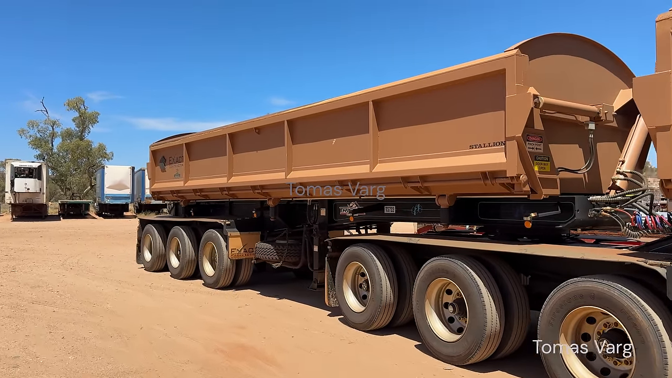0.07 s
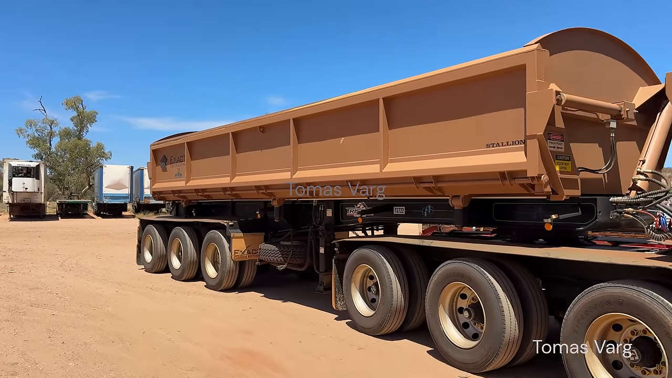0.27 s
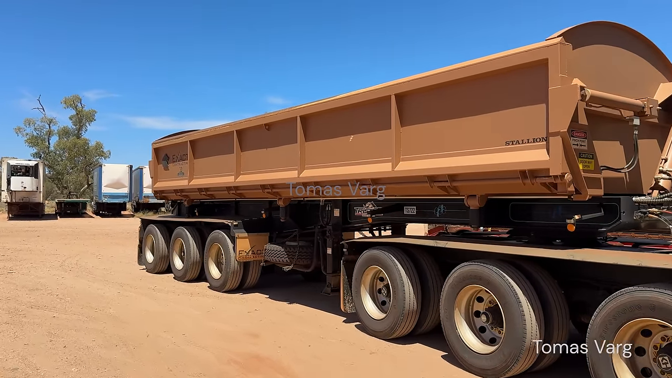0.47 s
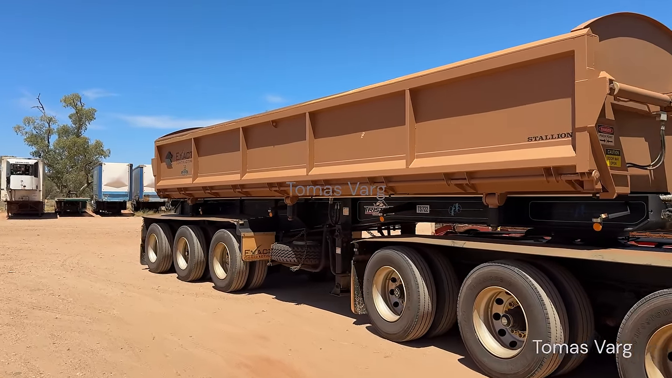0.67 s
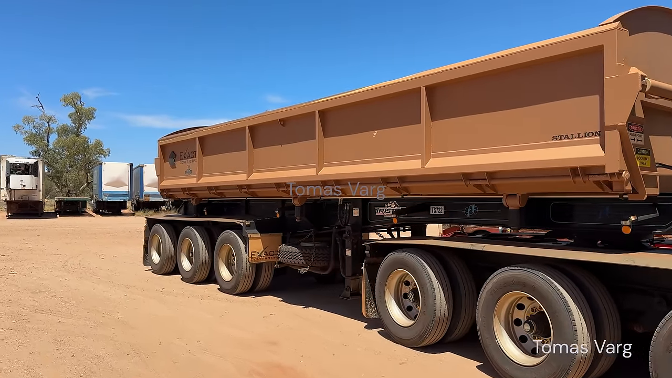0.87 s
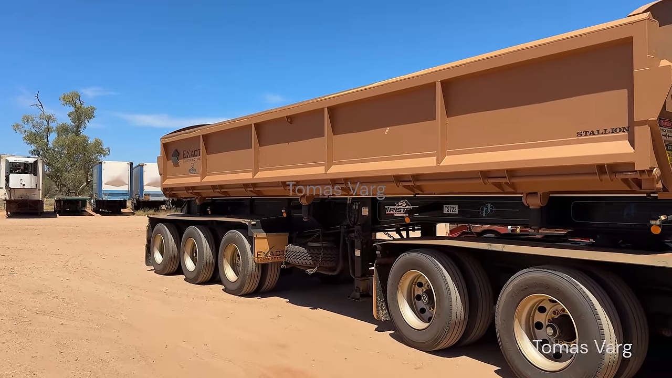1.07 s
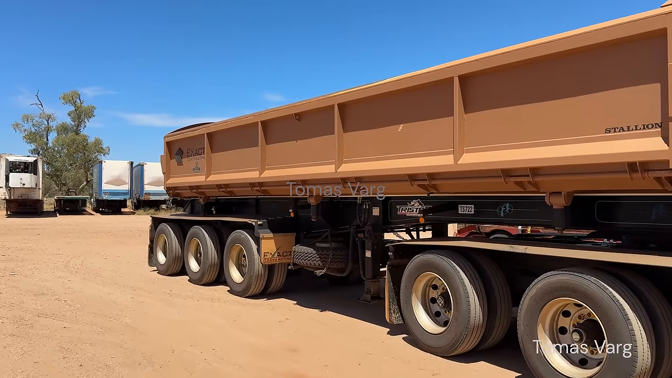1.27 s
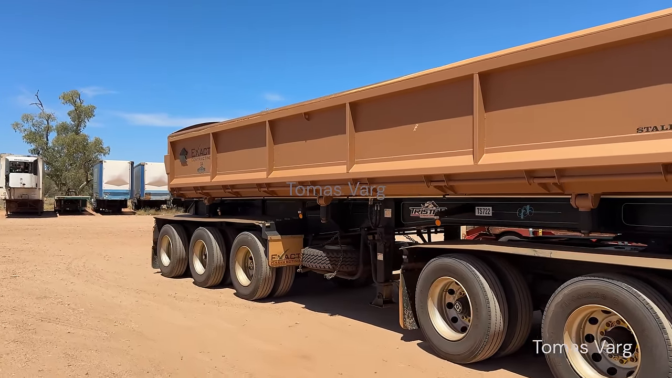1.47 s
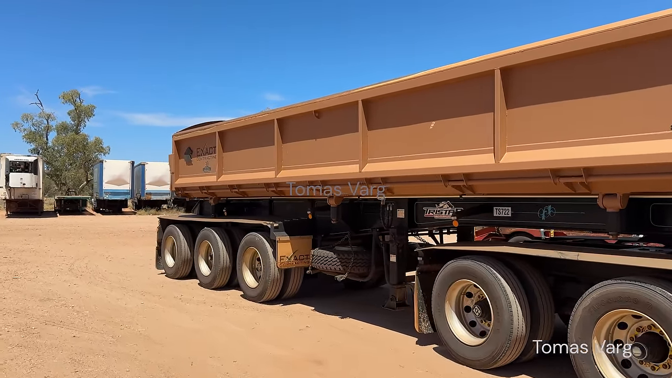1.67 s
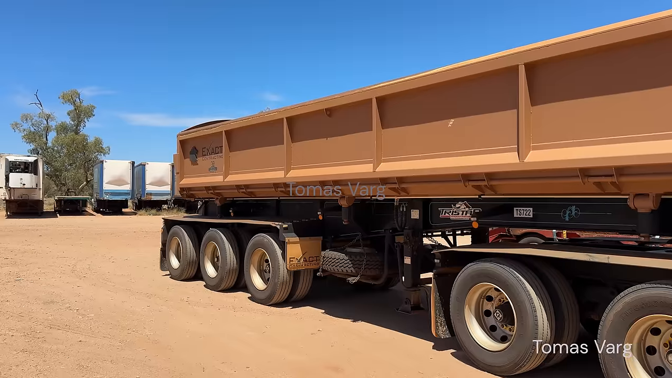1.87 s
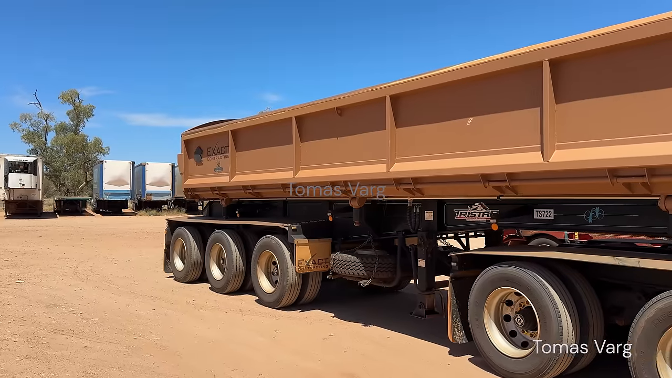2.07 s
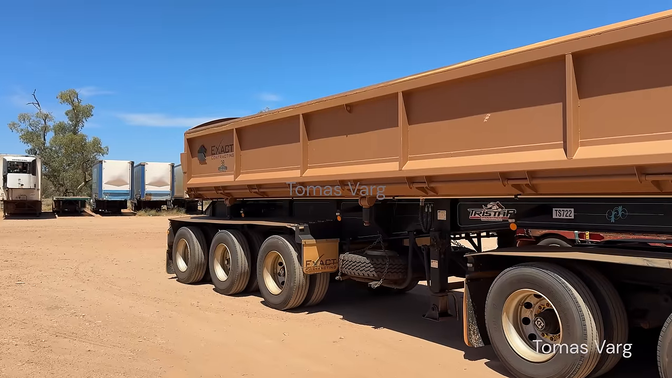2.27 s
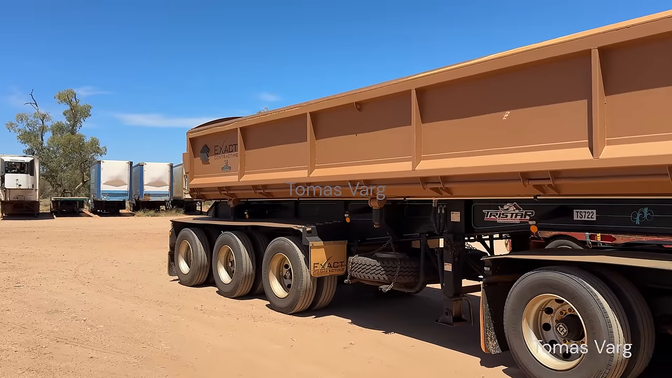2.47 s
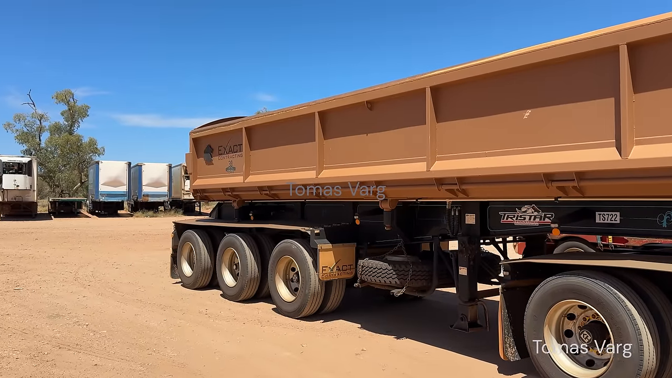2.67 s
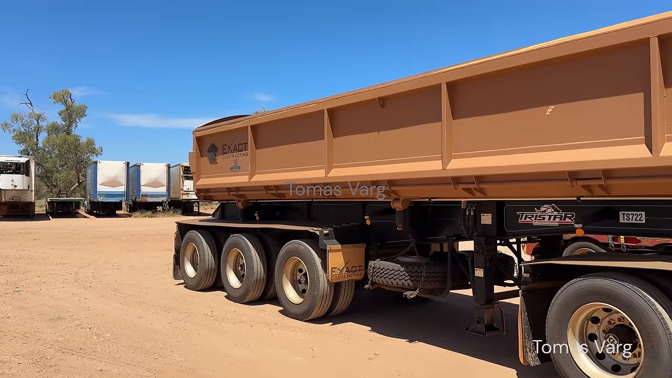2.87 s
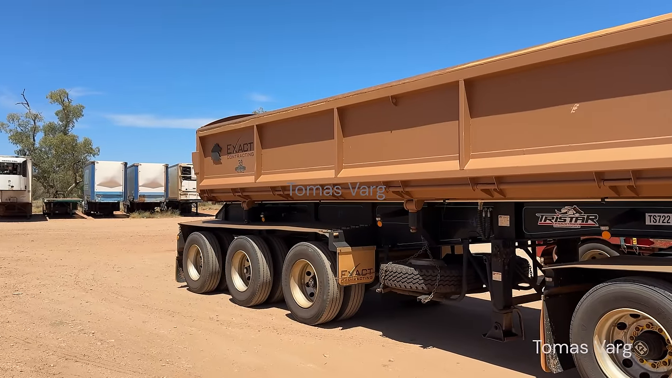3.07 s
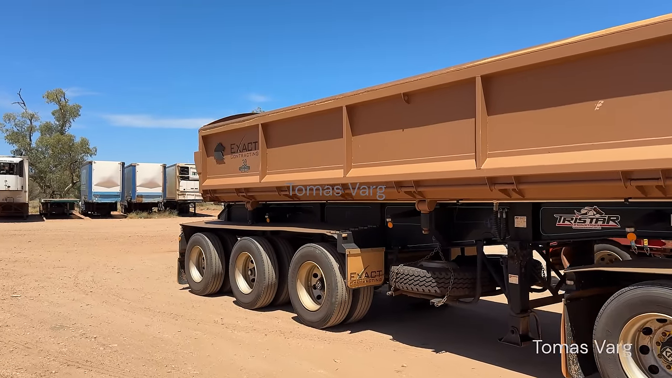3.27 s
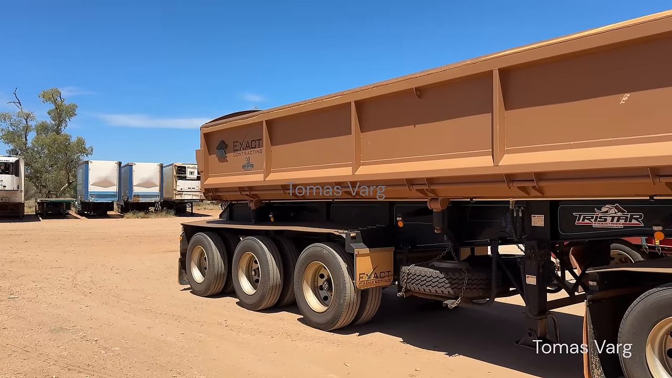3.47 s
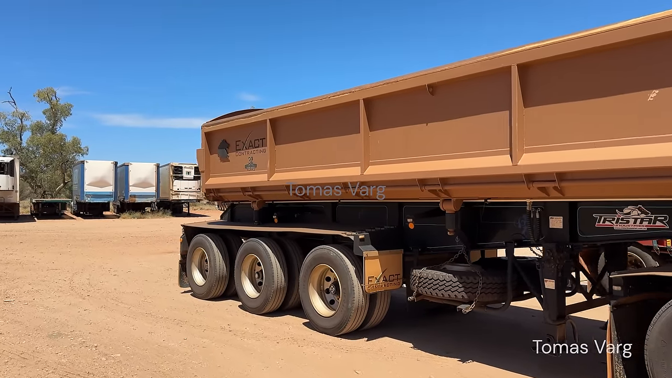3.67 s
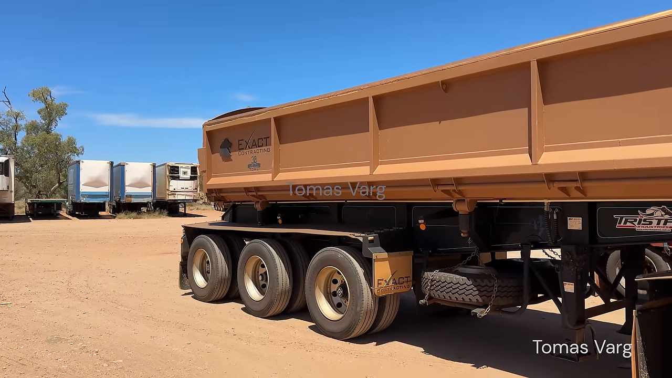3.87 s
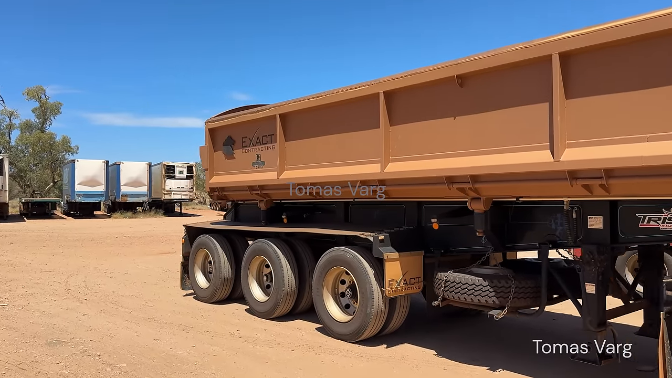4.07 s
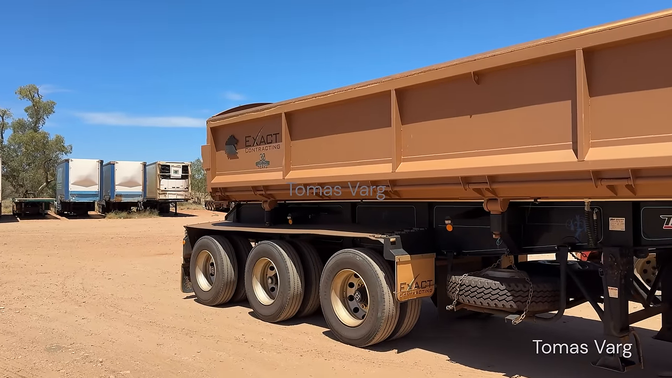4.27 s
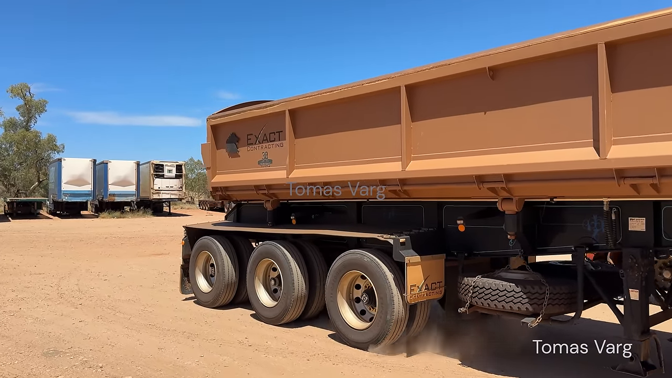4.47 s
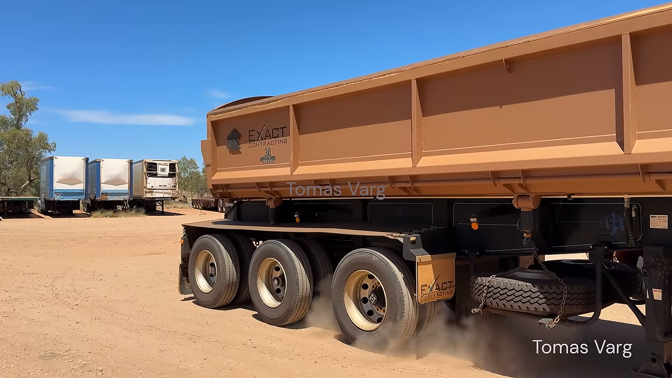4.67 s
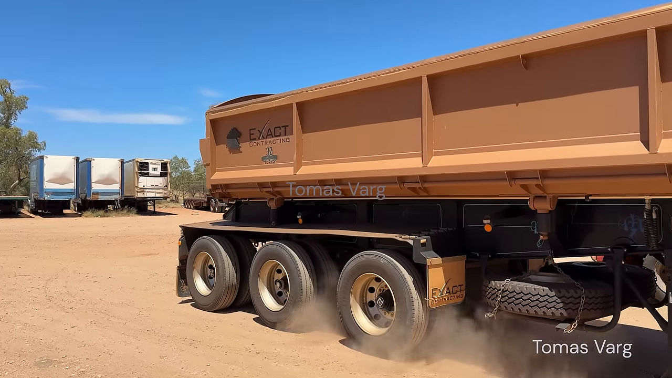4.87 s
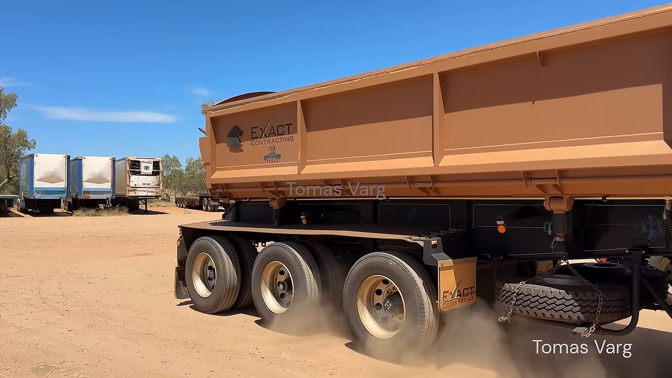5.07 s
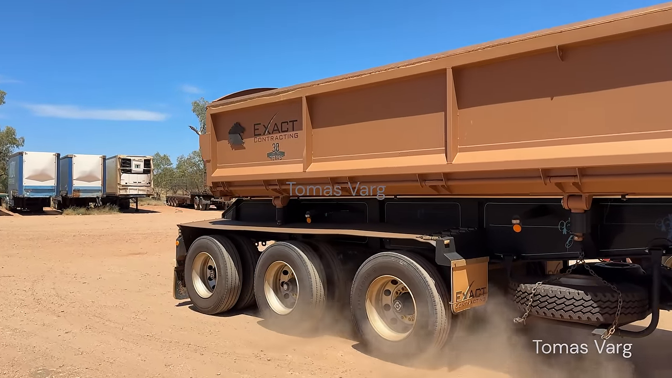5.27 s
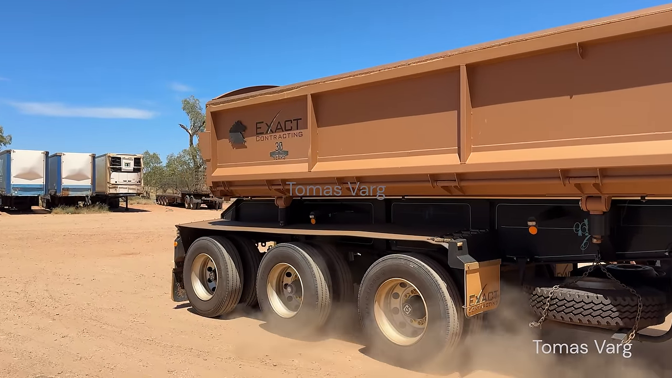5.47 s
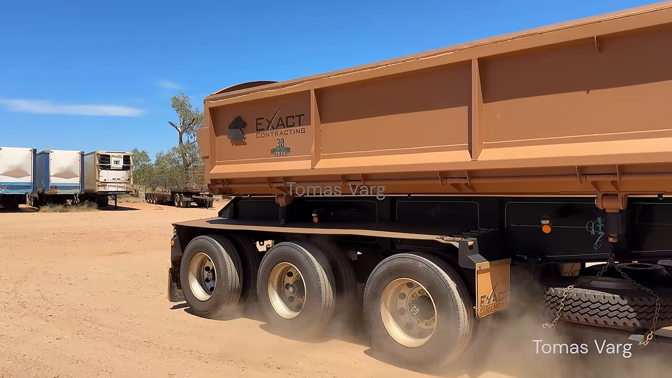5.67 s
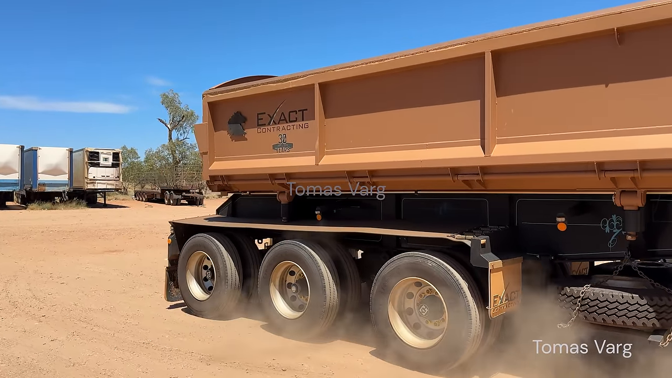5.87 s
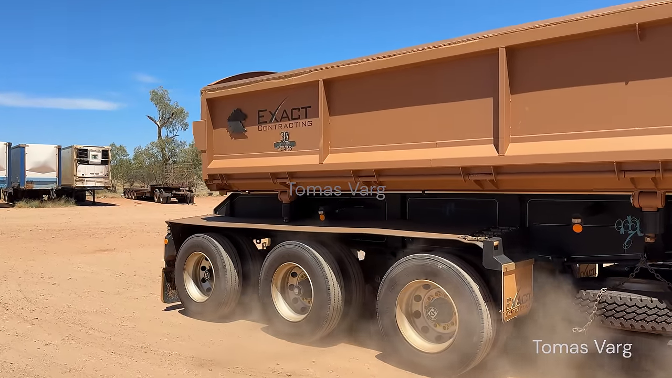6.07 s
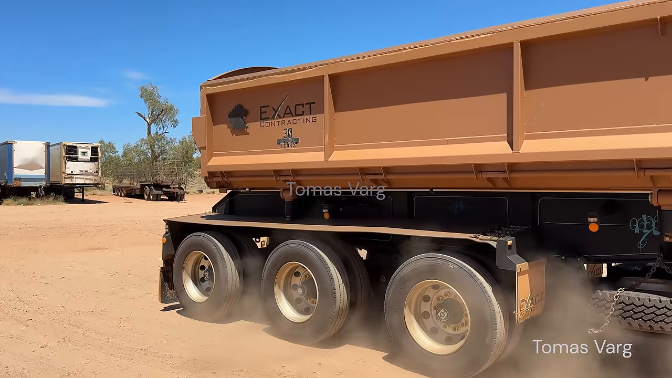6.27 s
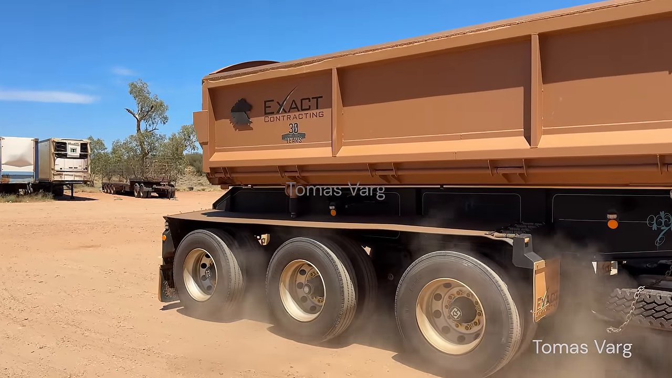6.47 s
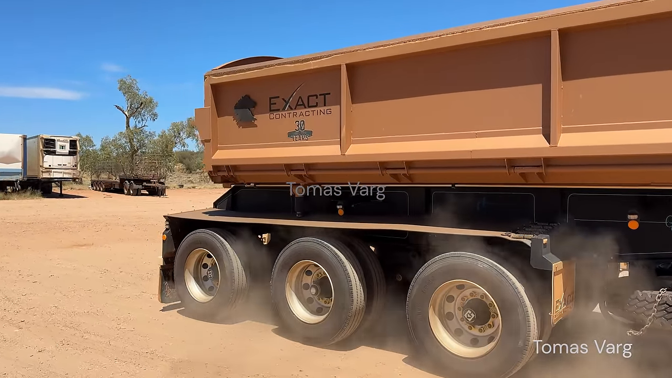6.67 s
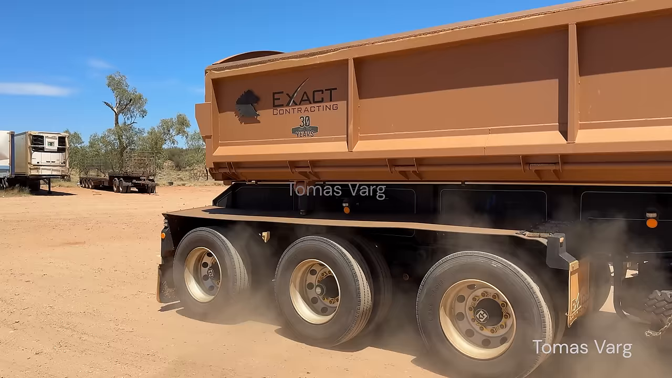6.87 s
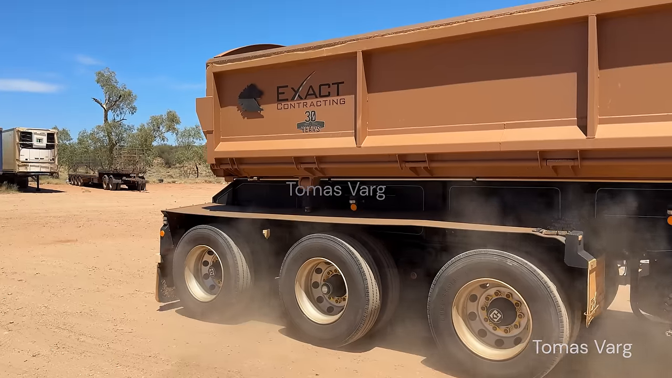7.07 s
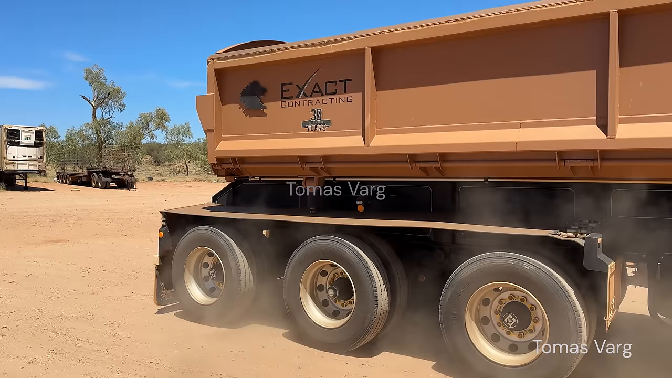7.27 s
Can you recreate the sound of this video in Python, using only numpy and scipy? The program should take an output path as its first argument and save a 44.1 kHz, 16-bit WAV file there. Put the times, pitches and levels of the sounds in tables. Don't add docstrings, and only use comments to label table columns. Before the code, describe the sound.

Steps crunch on grit over two idling diesels, then truck air brakes dump in loud overlapping hisses with low thumps, and a weaker second round follows.

```python
import sys
import numpy as np
from scipy import signal
from scipy.fft import rfft, irfft, next_fast_len
from scipy.io import wavfile

SR = 44100
rng = np.random.default_rng(int(sys.argv[2]) if len(sys.argv) > 2 else 0)


def file_out(sig):
    cols = np.atleast_2d(sig).T
    lim = np.clip(cols, -1, 1)
    pcm = np.round(lim * 32767).astype(np.int16)
    wavfile.write(sys.argv[1], SR, pcm)


def linear_from_db(decibels):
    return 10 ** (np.asarray(decibels, float) / 20)


N = 322812

# frequency in Hz, left minus right in dB.
FAR_BALANCE = [(60, 2.5), (110, 0.5), (200, 1.5), (380, -1.5), (700, -4.5), (1290, -2), (2380, -1.5),
               (4400, 5), (8120, 3.5), (15000, -15)]


def rms_one(x):
    return x / np.sqrt(np.mean(x ** 2) + 1e-20)


def in_time(rows):
    seconds, *columns = np.transpose(rows)
    return [np.interp(np.arange(N) / SR, seconds, column) for column in columns]


def at_hz(points, hz):
    table_hz, values = np.array(points).T[:2]
    return np.interp(np.log(hz), np.log(table_hz), values)


def drift(size, rate):
    knot_rate = 60
    knots = rng.standard_normal(int(size / SR * knot_rate) + 200)
    memory = np.exp(-2 * np.pi * rate / knot_rate)
    slow = rms_one(signal.lfilter([1], [1, -memory], knots))[190:]
    return np.interp(np.arange(size) / SR * knot_rate, np.arange(len(slow)), slow)


def stereo_noise(size, colour_db, like, balance, lag, patchy_db):
    hz = np.arange(1, size // 2 + 2) * SR / size
    shared, left, right = rfft(rng.standard_normal((3, size)))
    alike = np.clip(at_hz(like, hz), 0, 1)
    late = np.exp(-2j * np.pi * hz * lag / SR)
    pair = np.sqrt(alike) * shared * [late, np.ones_like(late)]
    pair += np.sqrt(1 - alike) * np.array([left, right])
    pair *= linear_from_db(colour_db(hz) + at_hz(balance, hz) / 2 * np.array([[1], [-1]]))
    octave = np.clip(np.log2(hz / 250), 0, 5)
    together = drift(size, 5.0)
    total = np.zeros((2, size))
    for k in range(6):
        band = irfft(pair * np.clip(1 - abs(octave - k), 0, 1), size)
        total += band * linear_from_db(patchy_db * (0.68 * together + drift(size, 10.3)))
    return rms_one(total)


def yard(gain, air):
    # frequency in Hz, level in dB per Hz.
    wash_colour = [(25, -33), (45, -12.5), (70, -2.5), (130, -7.5), (200, -18), (300, -22), (600, -26),
                   (1200, -29), (2200, -37), (3500, -48.5), (6000, -55), (9000, -62.5), (12000, -70.5),
                   (15500, -97)]
    # frequency in Hz, likeness of the two ports from 0 to 1.
    wash_like = [(60, 1), (250, 0.7), (600, 0), (1200, 0.55), (2500, 0.25), (8000, 0)]
    calm_db, stirred_db, stir_s = -41.5, -25, 0.05
    size = next_fast_len(N)
    wash = stereo_noise(size, lambda hz: at_hz(wash_colour, hz), wash_like, FAR_BALANCE, 10.6, patchy_db=1.4)
    memory = np.exp(-1 / (stir_s * SR))
    stirred = signal.lfilter([1 - memory], [1, -memory], np.mean(air ** 2, axis=0))
    power = (linear_from_db(calm_db) * gain) ** 2 + linear_from_db(stirred_db) ** 2 * abs(stirred)
    return np.sqrt(power) * wash[:, :N]


def diesel(curve, orders, wobble_db):
    hz, level_db = in_time(curve)
    turn = 2 * np.pi * np.cumsum(hz) / SR
    tones = np.zeros(N)
    for multiple, order_db in orders:
        swell = linear_from_db(order_db + wobble_db * drift(N, 3.3))
        tones += swell * np.sin(multiple * turn + rng.uniform(0, 2 * np.pi))
    return np.sqrt(2) * linear_from_db(level_db) * tones


def second_diesel():
    # time in seconds, firing rate in Hz, level in dB.
    idling = [(0, 43.06, -44.5), (1.6, 42.5, -43), (2.2, 43.35, -52), (4, 43.52, -57), (7.32, 42.5, -44)]
    # multiple of the firing rate, level in dB.
    idling_orders = [(1, -1), (2, 1.5), (3, -8.5), (4.5, -17), (9, -21.5)]
    return diesel(idling, idling_orders, wobble_db=1.8)


def hauling_diesel():
    # time in seconds, second firing order in Hz, level in dB.
    sagging = [(0, 60.2, -34.5), (.3, 59.9, -31.5), (1.6, 59.9, -33), (2.25, 58.4, -36.5),
               (2.65, 57.3, -36), (2.9, 58.6, -31.5), (3.3, 58.6, -37), (3.5, 59.9, -34.5),
               (7.32, 59.9, -37)]
    # multiple of that frequency, level in dB.
    hauling_orders = [(0.498, -20.5), (1, -1), (1.126, -12), (1.5, -19), (2, -18.5), (2.251, -17)]
    return diesel(sagging, hauling_orders, wobble_db=0.5)


def steps():
    # time in seconds, peak level in dB, centre in Hz, seconds for the crunch to fall 60 dB.
    footfalls = [(.017, -49.5, 2970, .2), (.017, -58, 8000, .35), (.095, -39.5, 1510, 0.085),
                 (.183, -44, 2900, .04), (.343, -57, 7500, 0.08), (.467, -50, 3800, .04),
                 (.595, -56, 7040, 0.25), (0.587, -46, 2460, 0.23), (.635, -57.5, 9500, 0.3),
                 (.728, -54.5, 8500, .06), (.9, -41.5, 2860, 0.074), (.929, -54, 3800, 0.046),
                 (1.175, -50.5, 3000, .2), (1.178, -59.5, 8000, .3), (1.258, -49, 2600, 0.17),
                 (1.74, -37.5, 1210, 0.076), (1.78, -43.5, 1900, 0.38), (1.84, -42, 1300, 0.079),
                 (2.14, -41.5, 1240, 0.16), (2.315, -43, 597, 0.25), (2.405, -38.5, 1520, 0.12),
                 (6.64, -43, 420, .3), (2.44, -41, 1200, 0.09), (6.414, -40.5, 2000, 0.083),
                 (6.518, -40, 1600, .04)]
    clicks_per_s = 5000
    out = np.zeros((2, N))
    t = np.arange(SR // 3) / SR
    shape = (2, len(t))
    for start, level_db, hz, t60 in footfalls:
        sizes = linear_from_db(5.8 * np.minimum(rng.exponential(1, shape), 4)) * rng.choice([-1, 1], shape)
        grit = sizes * (rng.random(shape) < clicks_per_s / SR)
        band = signal.butter(2, [hz / 1.9, hz * 1.08], "band", fs=SR, output="sos")
        crunch = rms_one(signal.sosfilt(band, grit + 0.5 * grit[::-1]))
        crunch *= linear_from_db(level_db - 4.0 - 60 * t / t60) * (1 - np.exp(-t / 0.0045))
        room = out[:, round(start * SR):][:, :len(t)]
        room += crunch
    return out


def thumps():
    # time in seconds, peak level in dB, pitch in Hz, seconds to fall 60 dB.
    releases = [
        (2.511, -16.5, 70.9, 0.14),
        (2.533, -25, 61.9, 0.15),
        (3.54, -33, 104, 0.48),
        (3.823, -9, 72.7, 0.051),
        (3.859, -16.5, 102.2, 0.1),
        (4.042, -25, 70.7, 0.17),
        (4.197, -27.5, 103.3, 0.2),
        (6.669, -27, 64.2, 0.15),
        (6.849, -29, 83, 0.15),
    ]
    out = np.zeros(N + SR)
    t = np.arange(SR // 2) / SR
    for start, level_db, hz, t60 in releases:
        push = np.sin(2 * np.pi * hz * t) * (1 - np.exp(-t / 0.0023)) * linear_from_db(level_db - 60 * t / t60)
        out[round(start * SR):][:len(t)] += push
    return out[:N]


def spit():
    # peak in seconds, level in dB, centre in Hz, rise in seconds, fall in seconds.
    puffs = [
        (1.636, -36, 5000, 0.013, 0.021),
        (1.66, -41.5, 4580, .01, 0.016),
    ]
    t = np.arange(N) / SR
    out = np.zeros((2, N))
    for peak_s, level_db, hz, rise_s, fall_s in puffs:
        band = signal.butter(1, [hz / 1.34, hz * 1.27], "band", fs=SR, output="sos")
        noise = signal.sosfilt(np.vstack([band, band]), rng.standard_normal((2, N)))
        swell = np.exp(-abs(t - peak_s) / np.where(t < peak_s, rise_s, fall_s))
        out += linear_from_db(level_db) * rms_one(noise) * swell
    return np.array([out[0] * linear_from_db(5.0), out[1]])


def valves(rows, jet, like, balance, lag_start, lag_per_s, rise_s, shut_db_s, direct_s):
    # frequency in Hz, width in Hz, level in dB.
    resonances = [(830, 60, -1.5), (1115, 140, 2.5), (2870, 38, 4), (3630, 105, 3), (4370, 120, 2.5),
                  (6300, 290, 2), (8360, 63, -6.5)]
    pop_db, pop_s = 0.5, 0.015
    direct_hz = 3940
    low_pass = signal.butter(2, direct_hz, fs=SR, output="sos")
    out = np.zeros((2, N + SR))
    for opens, shuts, level_db, fall, tilt in rows:
        size = next_fast_len(int((shuts - opens + 0.45) * SR))
        t = np.arange(size) / SR
        lag = lag_start + lag_per_s * opens

        def colour_db(hz):
            ringing = sum(db / (1 + (2 * (hz - f) / width) ** 2) for f, width, db in resonances)
            return at_hz(jet, hz) + ringing + tilt * np.log2(np.clip(hz, 300, 9000) / 3000)

        after_shut = np.clip(t - (shuts - opens), 0, None)
        flow_db = level_db + pop_db * np.exp(-t / pop_s) - fall * t - shut_db_s * after_shut
        flow = (1 - np.exp(-t / rise_s)) ** 2 * linear_from_db(flow_db)
        left, right = stereo_noise(size, colour_db, like, balance, lag, patchy_db=1.1)
        direct = np.exp(-(t / direct_s) ** 4)
        left = left + direct * signal.sosfiltfilt(low_pass, np.roll(right, round(lag)) - left)
        at = round(opens * SR)
        out[:, at:at + size] += flow * np.array([left, right])
    return out[:, :N]


def far_valves():
    # opens in seconds, shuts in seconds, level in dB, fall in dB per second,
    # tilt in dB per octave.
    far_openings = [
        (1.66, 2.6, -45.5, 7, 3),
        (2.504, 3.6, -31, 7, -0.77),
        (3.51, 4.1, -27.5, 11, 1.06),
        (3.819, 4.57, -20.5, -1.5, 1.4),
        (6.204, 6.7, -52.5, 10.5, 0.3),
        (6.537, 6.85, -42.5, 5, 3),
    ]
    # frequency in Hz, level in dB per Hz.
    far_jet = [(60, -24.5), (200, 0.5), (350, -6), (700, -5.5), (1150, -2), (1700, 1), (2300, -1),
               (3400, -0.5), (5000, -2), (6500, -2.5), (7600, -8.5), (9000, -12), (12000, -25.5),
               (15500, -33)]
    # frequency in Hz, likeness of the two ports from 0 to 1.
    far_like = [(100, 1), (500, 0.12), (1200, 0.86), (2500, 0.51), (4500, 0.52), (6500, 0.39), (8000, 0)]
    return valves(far_openings, far_jet, far_like, FAR_BALANCE, lag_start=8.65, lag_per_s=0.76,
                  rise_s=0.0074, shut_db_s=152.5, direct_s=0.01)


def near_valves():
    # opens in seconds, shuts in seconds, level in dB, fall in dB per second,
    # tilt in dB per octave.
    near_openings = [
        (4.037, 4.575, -17.5, 13, -1.5),
        (4.037, 5.55, -15.5, 7.66, 0.26),
        (4.2, 5.845, -17.5, 5.94, 0.11),
        (6.668, 7.4, -24.5, 7.5, 0.41),
        (6.84, 7.4, -23, 17.8, -0.18),
    ]
    # frequency in Hz, level in dB per Hz.
    near_jet = [(60, -22), (150, -6), (350, -8.5), (700, -1), (1150, 1.5), (1700, -3), (2300, -2.5),
                (3400, -3.5), (5000, -2), (6500, -2), (7600, -1.5), (9000, -0.5), (12000, -8), (15500, -12)]
    # frequency in Hz, likeness of the two ports from 0 to 1.
    near_like = [(100, 1), (500, 1), (1200, 0.7), (2500, 0.4), (4500, 0), (6500, 0.4), (8000, 0)]
    # frequency in Hz, left minus right in dB.
    near_balance = [(60, 4), (110, 13.5), (200, 0), (380, 1), (700, 0), (1290, 0), (2380, 0.5), (4400, 3),
                    (8120, -1.5), (15000, -17.5)]
    return valves(near_openings, near_jet, near_like, near_balance, lag_start=11.07, lag_per_s=0.33,
                  rise_s=0.0006, shut_db_s=434.5, direct_s=0.12)


def trailer_echo(x, t60, cut_hz):
    t = np.arange(int(0.6 * SR)) / SR
    scatter = [[1, 0.55], [1, -0.5]] @ rng.standard_normal((2, len(t)))
    scatter = scatter * linear_from_db(-60 * t / t60) * (t > 0.015)
    scatter = signal.sosfilt(signal.butter(1, cut_hz, fs=SR, output="sos"), scatter)
    scatter /= np.sqrt(np.sum(scatter ** 2) / 2)
    return signal.fftconvolve(x, scatter, axes=1)[:, :N]


def scene():
    # time in seconds, gain in dB.
    gain_curve = [
        (0, 0.5),
        (4.05, 1.9),
        (4.3, -19),
        (4.9, -15),
        (6.1, -9.5),
        (6.5, -8.5),
        (7.32, -6.5),
    ]
    gain = linear_from_db(in_time(gain_curve)[0])
    air = far_valves() + near_valves() + spit()
    echo = linear_from_db(-16.5) * trailer_echo(air, t60=0.33, cut_hz=1800)
    low = gain * (hauling_diesel() + second_diesel()) + thumps()
    low = low * linear_from_db([[0.4], [-0.4]])
    return air + echo + low + yard(gain, air) + steps()


def top_cut(x):
    return signal.sosfilt(signal.butter(12, 16190, fs=SR, output="sos"), x)


def record(dry):
    bass_cut_hz, ceiling, fade_in_s = 30, 3.9, 0.0081
    one_port_hz, null_hz, port_lag = 8300, 9600, 14.7
    treble_limit_hz = 15850
    bass_cut = signal.butter(2, bass_cut_hz, "high", fs=SR, output="sos")
    heard = signal.sosfilt(bass_cut, ceiling * np.tanh(dry / ceiling))
    heard = heard * np.clip(np.arange(N) / SR / fade_in_s, 0, 1) ** 2
    size = next_fast_len(N + SR // 10)
    hz = np.arange(size // 2 + 1) * SR / size
    left, right = rfft(heard, size) * (hz < treble_limit_hz)
    treble = np.clip((hz - one_port_hz) / 1200 + 0.5, 0, 1)
    copy = -right * np.exp(-2j * np.pi * (hz - null_hz) * port_lag / SR)
    left = np.sqrt(1 - treble) * left + np.sqrt(treble) * copy
    mix = np.array([irfft(left, size)[:N], irfft(right, size)[:N]])
    return top_cut(mix)


dry = scene()
out = record(dry)
file_out(out)
```